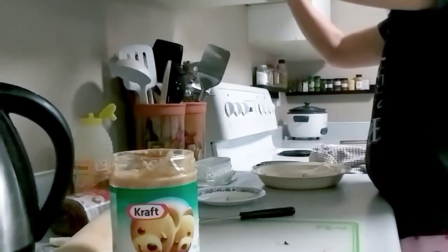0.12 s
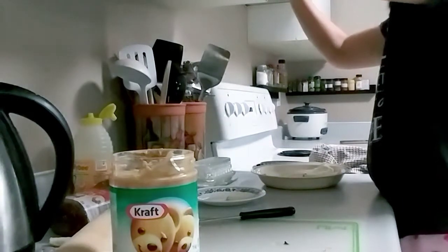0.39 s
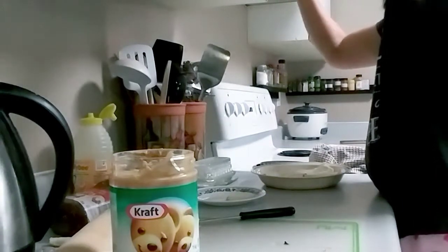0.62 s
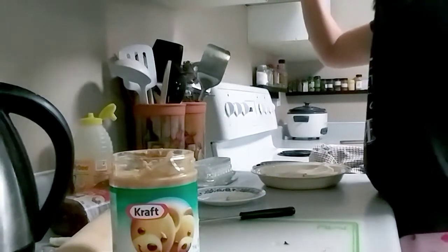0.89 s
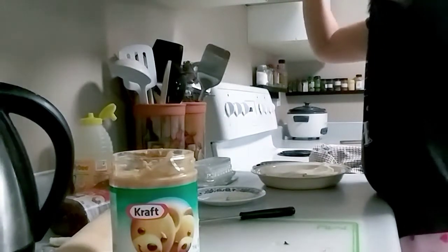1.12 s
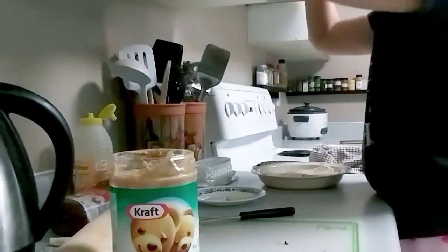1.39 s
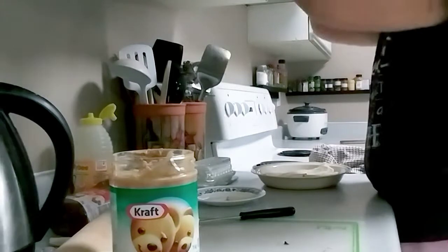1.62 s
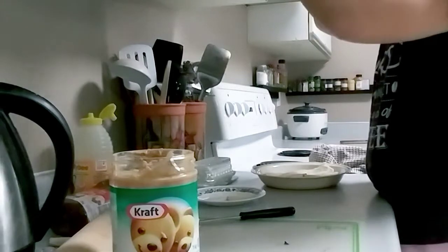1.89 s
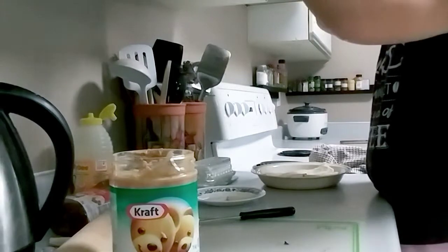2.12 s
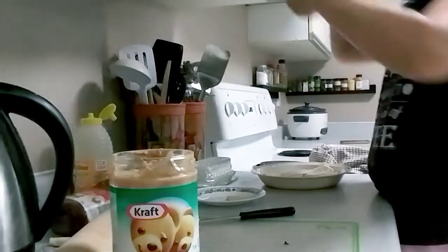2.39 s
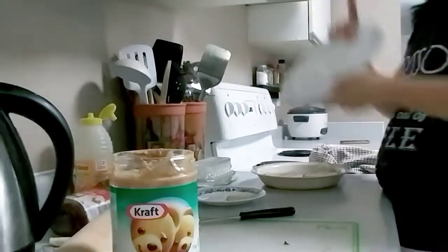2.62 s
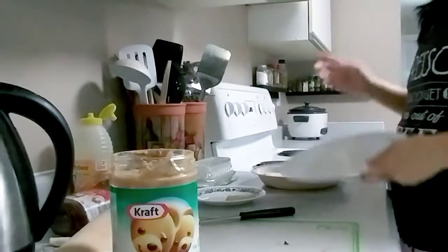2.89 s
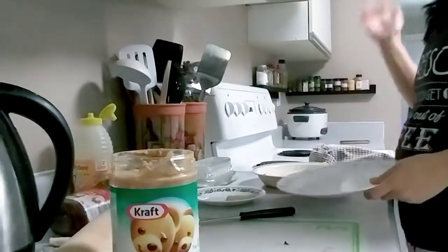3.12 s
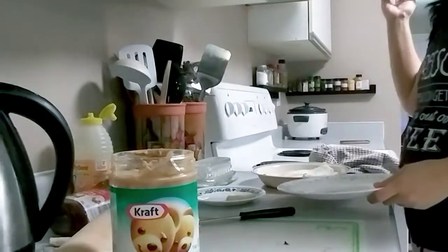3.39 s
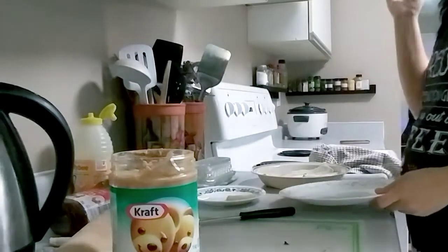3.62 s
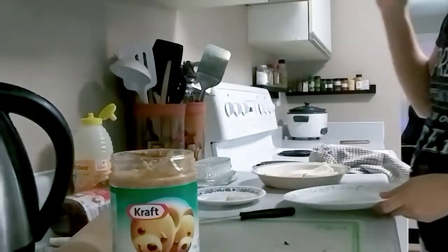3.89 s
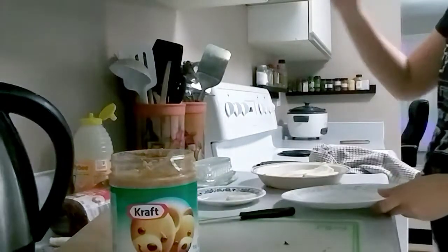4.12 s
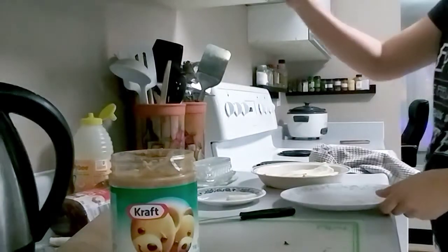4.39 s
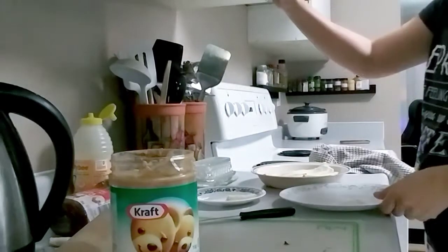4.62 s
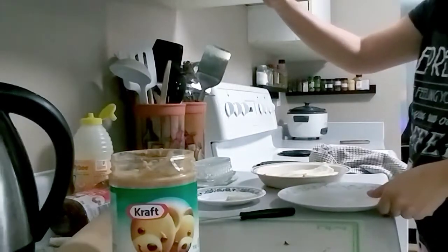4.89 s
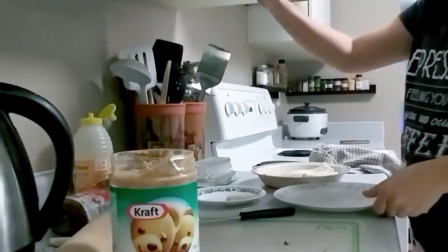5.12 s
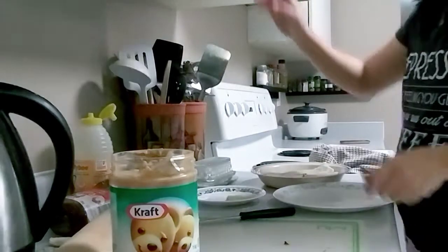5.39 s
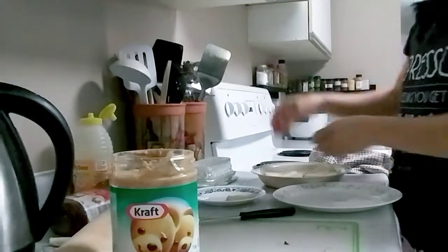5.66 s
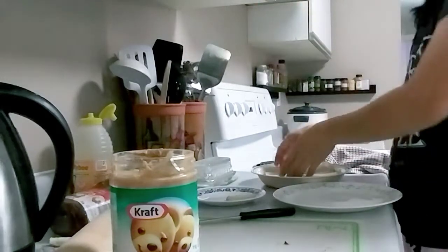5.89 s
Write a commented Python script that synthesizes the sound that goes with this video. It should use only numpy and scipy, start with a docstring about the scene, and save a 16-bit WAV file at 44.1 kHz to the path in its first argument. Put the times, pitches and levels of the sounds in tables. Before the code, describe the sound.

Ceramic plates knock, scrape and ring irregularly inside a cupboard, with a few hard blows that thump the wood. After a last clack the sound thins to room air, a low appliance hum and tiny touches. A cupboard door knocks and its hinge chirps briefly; later comes a light grip, a heavy low door thud and a bright short plate clink. Small reverberant kitchen, stereo leaning right, loud hits squeezed by automatic gain.

```python
"""Dishes rattle in a kitchen cupboard as a plate is drawn from the stack; doors knock, a hinge squeaks,
a door thuds shut and the plate clinks on the counter, over room air and an appliance hum.
Blows are short noisy contacts that set off broad resonances and thin ringing tones in a small hard room.
The squeak is a gliding stack of tones, the thuds are low sines, sliding and soft noises are shaped noise.
A stereo microphone with gain control picks it all up, louder on the right."""
import sys
import numpy as np
from scipy import signal
from scipy.fft import rfft, irfft, next_fast_len
from scipy.io import wavfile
from scipy.ndimage import uniform_filter1d, map_coordinates

SR = 44100
rng = np.random.default_rng(int(sys.argv[2]) if len(sys.argv) > 2 else 0)


def generate_wav(sig):
    """Save sig (samples, or channels by samples) to the path in sys.argv[1] as 16-bit PCM at SR."""
    pcm = np.round(np.clip(np.atleast_2d(sig).T, -1, 1) * 32767).astype(np.int16)
    wavfile.write(sys.argv[1], SR, pcm)


def voltage_ratio(decibels):
    """Convert decibels (scalar or array-like) to amplitude ratios, 20 dB per decade."""
    exponent = np.asarray(decibels, float) / 20
    return 10 ** exponent


N = 265246
LENGTH = 2 ** 15  # samples in the sound of one blow
LEFT_DB = -4.5  # left channel against the right

# broad resonances of struck dishes, from boom, thump and bowl to crack and sheen: (centre [Hz], width [Hz])
DISH_BODY = [(115, 64), (300, 240), (770, 460), (2600, 4600), (8500, 11000)]
# the same five for a wooden door: (centre [Hz], width [Hz])
DOOR_BODY = [(125, 58), (330, 310), (640, 660), (1700, 5700), (6000, 4000)]


def unit(x):
    """Scales a sound to rms 1."""
    return x / np.sqrt(np.mean(x ** 2) + 1e-20)


def along(points, hz):
    """Reads a curve of (Hz, value) points on a logarithmic frequency axis."""
    f, v = np.transpose(points)
    return np.interp(np.log(hz + 1), np.log(f + 1), v)


def curves(rows):
    """Joins timed rows by straight lines: one value per sample for each column after the time."""
    s, *cols = np.transpose(rows)
    return [np.interp(np.arange(N) / SR, s, c) for c in cols]


def wobble(rate):
    """A smooth random curve through rate random points a second."""
    knots = rng.standard_normal(int(N * rate / SR) + 4)
    return map_coordinates(knots, [np.arange(N) * rate / SR])


def filtered(x, response):
    """Multiplies the spectrum of x by a response of frequency."""
    m = next_fast_len(x.shape[-1] + 8192)
    spectrum = rfft(x, m) * response(np.fft.rfftfreq(m, 1 / SR))
    return irfft(spectrum, m)[..., :x.shape[-1]]


def resonance(f, hz, width_hz):
    """The response of a resonance that rings after it is struck, with gain 1 at its centre."""
    return 1j * f * width_hz / (hz * hz - f * f + 1j * f * width_hz)


def spread(pair, gain):
    """Mixes two unrelated noises into left and right: alike in the bass, nearly unrelated above."""
    # how alike left and right are: (frequency [Hz], likeness [0 to 1])
    alike = [(60, 1), (200, 0.7), (400, 0.75), (900, 0.024), (1500, 0.042)]

    def mid_side_gains(f):
        turn = np.arccos(np.clip(along(alike, f), -1, 1)) / 2
        return gain(f) * [np.cos(turn), np.sin(turn)]

    mid, side = filtered(pair, mid_side_gains)
    return np.array([mid + side, mid - side])


def rush(spectrum):
    """Steady stereo noise of rms 1 with the given tone colour."""
    return unit(spread(rng.standard_normal((2, N)), lambda f: voltage_ratio(along(spectrum, f))))


def room(direct):
    """A fresh stereo echo tail of energy 1 after the direct sound; near walls make its start denser."""
    # time in which each pitch dies away by 60 dB: (frequency [Hz], t60 [s])
    kitchen = [(60, 0.99), (250, 0.31), (1000, 0.46), (4000, 0.4), (9000, 0.31), (14000, 0.2)]
    f, t, z = signal.stft(rng.standard_normal((2, LENGTH // 2)), SR, nperseg=256)
    decay = voltage_ratio(-60 * t / along(kitchen, f)[:, None])
    tail = signal.istft(z * decay, SR, nperseg=256)[1]
    t = np.arange(tail.shape[1]) / SR
    onset = (1 - np.exp(-t / 0.0019)) * (1 + 2.0 * np.exp(-t / 0.0082))
    tail = spread(tail, np.ones_like) * onset
    tail /= np.sqrt(np.sum(tail ** 2) / 2)
    tail[:, 0] += direct
    return tail


def blows(rows, bands, modes, gain_db, ring_db, scatter_db, contact_s, direct, open_air, boom_db,
          detune, follow):
    """Each blow: a brief rough contact through broad body resonances and thin modes, into the room.

    scatter_db and detune vary the modes from blow to blow; follow is how far they take the body's colour.
    """
    out = np.zeros((2, N + LENGTH))
    f = np.fft.rfftfreq(LENGTH, 1 / SR)
    t = np.arange(2000) / SR
    for s, db, thump_db, bowl_db, sheen_db in rows:
        # one sharp touch, then a short chatter
        contact = voltage_ratio(-60 * t / contact_s) * rng.standard_normal(len(t))
        contact *= .75 / np.linalg.norm(contact)
        contact[0] = .4

        levels = (thump_db + boom_db, thump_db, bowl_db, 0, sheen_db)
        body = 0
        for k, ((hz, width), level) in enumerate(zip(bands, levels)):
            # applied twice, a resonance spills less to its sides; the root of the width keeps its energy
            body = body + (-1) ** k * voltage_ratio(level) * resonance(f, hz, width) ** 2 * np.sqrt(SR / width)

        # where the blow lands colours the modes like the body
        colour = [(hz, follow * level) for (hz, width), level in zip(bands[1:], levels[1:])]
        ring = 0
        for hz, level, t60 in modes:
            mode_db = ring_db + level + along(colour, hz) + scatter_db * rng.standard_normal()
            mode_hz = hz * (1 + detune * rng.standard_normal())
            width = np.log(1000) / np.pi / t60
            # the factor t60 makes the starting strength independent of the ringing time
            ring = ring + voltage_ratio(mode_db) * resonance(f, mode_hz, width) * t60

        answer = rfft(room(direct), LENGTH)
        # ringing also goes straight to the microphones, arriving a little later on the left
        straight = open_air * np.exp(-2j * np.pi * f * np.array([[.00008], [0]]))
        spectrum = body * (rfft(contact, LENGTH) * answer + ring * (answer + straight))
        sound = irfft(spectrum, LENGTH) * np.linspace(1, 0, LENGTH) ** .5
        # the sound takes a few milliseconds to build
        sound *= np.minimum(1, .45 + np.arange(LENGTH) / SR / .009)
        out[:, round(s * SR):][:, :LENGTH] += voltage_ratio(db + gain_db) * sound
    return out[:, :N]


def background():
    """Room air is noise that wavers a little; the appliance hum is noise through a narrow low resonance."""
    # tone colour of the room air: (frequency [Hz], relative level [dB])
    air_colour = [(25, -31), (60, -5.5), (120, -15), (200, -20), (600, -24), (1300, -30.5), (3000, -32.5),
                  (9000, -44.5)]
    # appliance hum: (centre [Hz], width of the resonance [Hz], level [dB])
    hum_settings = (118, 22, -62)
    air_db = -66.5 + 1.5 * wobble(5.3)
    hz, width_hz, hum_db = hum_settings
    hum = unit(filtered(rng.standard_normal(N), lambda f: resonance(f, hz, width_hz) ** 2))
    return voltage_ratio(air_db) * rush(air_colour) + voltage_ratio(hum_db) * hum


def soft_noises():
    """Sleeve rustles, a knock's dull thump, the closing door's puff: each swells, then fades more slowly."""
    # (time of the peak [s], length [s], level [dB], lowest frequency [Hz], highest frequency [Hz])
    puffs = [(2.639, 0.018, -66, 6940, 8450), (3.06, 0.021, -70, 1197, 4860),
             (3.299, 0.044, -73.5, 1494, 8400), (3.523, 0.02, -41, 69.4, 1300),
             (3.532, 0.017, -52.5, 1040, 6000), (3.949, .03, -39, 1660, 13800),
             (4.288, 0.044, -64.5, 293, 8320), (4.979, 0.0067, -39, 220, 1620),
             (4.988, 0.015, -39, 224, 1490)]
    t, out = np.arange(N) / SR, np.zeros((2, N))
    for s, length, db, low_hz, high_hz in puffs:
        rise = np.exp(-((t - s) / length) ** 2)
        fade = 1 / np.cosh(np.clip((t - s) / length / 1.7, 0, 20))
        swell = np.where(t < s, rise, fade)
        band = [(low_hz / 2, -24), (low_hz, 0), (high_hz, -9), (high_hz * 2, -36), (high_hz * 4, -90)]
        out += voltage_ratio(db + 2.2 * wobble(90)) * swell * rush(band)
    return out


def sliding():
    """Dishes and hands rub along: uneven, grainy noise in a dull and a bright part."""
    # loudness of the rubbing before its unevenness: (time [s], level [dB])
    slide = [(0, -49.5), (.1, -39.5), (.4, -56.5), (.47, -50), (.6, -40), (.85, -61.5), (1.1, -52),
             (1.3, -53), (1.47, -68), (1.54, -58), (1.78, -54.5), (1.87, -65.5), (1.95, -47.5), (2.3, -91)]
    # tone colour of the dull part: (frequency [Hz], relative level [dB])
    dull_colour = [(150, -32), (300, -7), (800, -2.5), (1600, -6), (3000, -38)]
    # tone colour of the bright part: (frequency [Hz], relative level [dB])
    bright_colour = [(1000, -24.5), (2200, 2), (4500, -2), (6500, -8), (7900, -6), (9500, -19),
                     (11000, -32), (16000, -31.5)]
    level = voltage_ratio(curves(slide)[0]) * (np.arange(N) / SR < slide[-1][0])
    dull = voltage_ratio(0.7 + 3.0 * wobble(18) + 0.77 * wobble(130)) * rush(dull_colour)
    bright = voltage_ratio(5.9 * wobble(40) + 2.9 * wobble(130)) * rush(bright_colour)
    return level * (dull + bright)


def hinge():
    """The hinge sticks and slips at a jittery rate: a gliding stack of tones, mostly heard via the room."""
    # (time [s], slips per second [Hz], level [dB])
    slips = [(3.884, 1725, -47), (3.909, 1680, -35), (3.918, 1500, -31), (3.927, 1340, -30),
             (3.942, 1335, -34), (3.952, 1500, -42), (3.961, 1830, -32), (3.976, 2150, -31),
             (3.986, 2120, -40), (3.999, 1980, -51)]
    # how strongly the door sends out each pitch: (frequency [Hz], level [dB])
    door_colour = [(1300, -15.5), (2000, -4.5), (2800, -3.5), (3500, 0.5), (3900, -14), (4300, -9),
                   (5000, -10), (7000, -10.5), (8200, -8), (10000, -15)]
    # a thin whistle as the hinge first gives: (start [s], rise [s], start pitch [Hz],
    # settled pitch [Hz], sag [Hz per s], peak level [dB], fade [dB per s])
    whistle = (3.815, .02, 5700, 5420, 3200, -41, 110)
    t = np.arange(N) / SR
    start, stop = slips[0][0], slips[-1][0]
    hz, db = curves(slips)

    # the squeal breaks up as the door speeds: roughness doubles every 22 ms
    rough = .07 * 2 ** (np.clip(t - start, 0, stop - start) / .022)
    phase = 2 * np.pi * np.cumsum(hz * (1 + .05 * rough * wobble(400))) / SR
    gate = np.clip((t - start) / 0.013, 0, 1) * np.clip((stop - t) / 0.0046, 0, 1)
    squeak = np.zeros(N)
    for k in range(1, 7):
        partial_db = db + along(door_colour, k * hz)
        flicker_db = 4.1 * np.minimum(rough, 1) * wobble(200)
        squeak += gate * voltage_ratio(partial_db + flicker_db) * np.sin(k * phase)

    s, rise, start_hz, settled_hz, sag_hz, peak_db, fade_db = whistle
    u = np.clip(t - s, 0, None)
    pitch = settled_hz - sag_hz * u + (start_hz - settled_hz) * np.exp(-2 * u / rise)
    pitch = pitch * (1 + .005 * wobble(400))
    whistle_db = peak_db - fade_db * np.clip(u - rise, 0, None) + 2 * wobble(200)
    swell = np.minimum(u / rise, 1) ** 2 * voltage_ratio(whistle_db) * (t < slips[1][0])
    squeak += swell * np.sin(2 * np.pi * np.cumsum(pitch) / SR)
    return signal.fftconvolve(squeak[None], room(direct=0.79), axes=1)[:, :N]


def low_thuds():
    """Low tones swell with each thump of the cupboard and are choked shortly after."""
    # two hard dish blows that thump the cupboard, then the closing door:
    # (start [s], rise [s], stop [s], pitch [Hz], level [dB], t60 before the stop [s])
    thumps = [(.555, .015, .7, 111, -23.5, .3), (1.183, 0.0097, 1.26, 122.6, -30.5, 0.35),
              (4.966, .035, 5.003, 123.1, -6.5, .6), (4.997, 0.0035, 5.062, 63.65, -16.5, 0.58),
              (5.1, 0.0085, 5.3, 60.95, -25.5, 0.22)]
    t, out = np.arange(N) / SR, np.zeros(N)
    for s, rise, stop, hz, db, t60 in thumps:
        u = np.clip(t - s, 0, None)
        swell = 1 - np.exp(-(u / rise) ** 2)
        choke_db = -60 * np.clip(t - stop, 0, None) / 0.017
        out += voltage_ratio(db - 60 * u / t60 + choke_db) * swell * np.sin(2 * np.pi * hz * u)
    return out


def door_grips():
    """A hand takes hold of the second door: its panel and handle ring briefly."""
    # (time [s], level before gain_db [dB], then relative thump [dB], bowl [dB], sheen [dB])
    grips = [(4.609, -35, 8.8, 8, -10), (4.629, -44.5, 22, 7.9, -25)]
    # ringing of the door and its handle: (frequency [Hz], relative level [dB], t60 [s])
    handle_modes = [(336, -11.5, .2), (458, -15.5, 0.23), (684, -11, 0.38), (899, -6, 0.089),
                    (2220, -1, 0.12), (2760, 7, .05), (3350, 17, 0.035), (4075, 11.5, .07)]
    return blows(grips, DOOR_BODY, handle_modes, gain_db=16.0, ring_db=23, scatter_db=1.5,
                 contact_s=0.039, direct=1.0, open_air=1.4, boom_db=-8.5, detune=0, follow=0)


def door_knocks():
    """Doors and hands knock on wood, whose ringing dies away quickly at most high pitches."""
    # (time [s], level before gain_db [dB], then relative thump [dB], bowl [dB], sheen [dB])
    knocks = [(3.239, -65, 8, -12, -26), (3.501, -51.5, 3.5, 14.5, -28), (3.785, -21.5, -1, 8, -14),
              (5.818, -62.5, 7.5, 10, 0)]
    # ringing of the doors before random detuning: (frequency [Hz], relative level [dB], t60 [s])
    wood_modes = [(141, -3.5, 0.1), (310, -15.5, 0.22), (735, -8.5, 0.41), (1123, -10.5, 0.11),
                  (1332, 1, 0.059), (2226, 7.5, 0.048), (3420, 14, 0.029), (4330, 1, .09)]
    return blows(knocks, DOOR_BODY, wood_modes, gain_db=17.5, ring_db=24.5, scatter_db=2.5,
                 contact_s=0.043, direct=0.76, open_air=0.97, boom_db=-7.0, detune=.01, follow=0)


def plate_grazes():
    """The lifted plate grazes its neighbours and rings faintly."""
    # (time [s], level before gain_db [dB], then relative thump [dB], bowl [dB], sheen [dB])
    grazes = [(2.3971, -58.5, -7, -4, 5.4), (2.5094, -66, -5, -5, 1), (2.655, -56, -9, -16, 2)]
    # ringing of the lifted plate: (frequency [Hz], relative level [dB], t60 [s])
    lifted_plate_modes = [(759, -8, .19), (1380, -14, .2), (2299, -10, .18), (3435, -14, .2), (4441, 2, .07),
                          (5000, -8, .07), (5900, 0, .05), (7820, -3, .06), (8070, -2, .05)]
    return blows(grazes, DISH_BODY, lifted_plate_modes, gain_db=16.5, ring_db=35.5, scatter_db=1.5,
                 contact_s=0.032, direct=.3, open_air=2.5, boom_db=-2.0, detune=0, follow=0.62)


def plate_clinks():
    """The plate meets the counter and settles in quick touches, ringing in the open."""
    # (time [s], level before gain_db [dB], then relative thump [dB], bowl [dB], sheen [dB])
    clinks = [(5.059, -16, -15.5, -6, -2.5), (5.066, -6, -7.5, -8.5, -3), (5.075, -13, -13.5, -13.5, -3.5)]
    # ringing of the plate: (frequency [Hz], relative level [dB], t60 [s])
    plate_modes = [(705, -14, .12), (1346, -12, .2), (1997, -2, .15), (2019, -16.5, .58), (2040, -8, .24),
                   (2186, -18, .25), (2988, -12, .15), (3122, -6, .22), (3165, 2, .11), (3500, -3, .06),
                   (4064, -5, .17), (4484, 0, .13), (5000, -6, .07), (7542, -14, .2), (8258, -4, .12),
                   (8430, -12, .22)]
    return blows(clinks, DISH_BODY, plate_modes, gain_db=9.0, ring_db=32.5, scatter_db=1.5,
                 contact_s=0.008, direct=.3, open_air=2.4, boom_db=3.5, detune=0, follow=0)


def rebounds(rows):
    """A dish struck hard rocks and lands again 17 ms later, weaker, with more wood and less sheen."""
    second = [(s + .017, db - 6, thump + 6.5, bowl, sheen - 3.5)
              for s, db, thump, bowl, sheen in rows if db > -15]
    return rows + second


def dish_clatter():
    """Dishes in the stack knock together; each blow rings them a little differently."""
    # (time [s], level before gain_db [dB], then relative wooden thump [dB], bowl [dB], sheen [dB])
    clatter = [(0.0296, -33, 3, -10, -22), (0.1487, -1, -17, -5, -3.5), (0.4227, -34, -6, -6.5, -5),
               (0.4489, -26, -6.5, -9.5, -3), (0.4997, -16, -11.5, -9, -16), (0.5481, 1.5, -12.5, -14, -8),
               (0.8795, -28, -2, -3.5, -27), (0.915, -48.5, 12, -1.5, -20.5),
               (0.9904, -28, -14, -10.5, -0.5), (1.073, -24.5, -16, -18, -5),
               (1.115, -44, 9.5, -23.5, -2.5), (1.1784, -15, -12, -8.5, -3), (1.377, -53.5, 0, 2, 0),
               (1.507, -38.5, -21, -47, -2), (1.5729, -37.5, -14.5, -11.5, -1),
               (1.6479, -35, -13.5, -13, -1), (1.7054, -25, -17, -18, -9), (1.7637, -29.5, -14.5, -43, -13),
               (1.8849, -33, -28.5, -48, -0.5), (1.9298, -23.5, -16, -17.5, 1),
               (1.9863, -8.5, -15.5, -15.5, 1)]
    # ringing of the dishes before random detuning: (frequency [Hz], relative level [dB], t60 [s])
    stack_modes = [(300, -11, .09), (741, -6, .22), (823.7, -1, .24), (1220, -12, .18), (1380, -12, .16),
                   (1770, -8, .1), (1900, -7, .17), (2300, -15, .16), (2410, -14.5, .15), (2960, -12, .2),
                   (3480, -10, .18), (3736, -12.5, .075), (4390, -14, .17), (5270, -16, .12),
                   (7600, -8, .1), (7900, -3, .12)]
    return blows(rebounds(clatter), DISH_BODY, stack_modes, gain_db=19.0, ring_db=26.0, scatter_db=3,
                 contact_s=0.026, direct=0.64, open_air=0.95, boom_db=-6, detune=.01, follow=0.67)


def scene():
    """Adds all sources, louder on the right."""
    mix = background() + soft_noises() + sliding() + hinge() + low_thuds()
    mix = mix + door_grips() + door_knocks() + plate_grazes() + plate_clinks() + dish_clatter()
    return mix * voltage_ratio([[LEFT_DB / 2], [-LEFT_DB / 2]])


def top_cut(x):
    """Nothing passes above the cut-off."""
    return signal.sosfilt(signal.butter(12, 16290, fs=SR, output="sos"), x)


def record(dry):
    """Overall tone colour and amplifier hiss, gain control that holds back loud moments, a hard ceiling."""
    # overall tone colour, with a gap from 10 to 12 kHz: (frequency [Hz], level [dB])
    tone_colour = [(30, -25), (55, 5), (7000, -2.5), (7900, 5.5), (8900, -3), (10000, -21), (11600, -24.5),
                   (12400, -10.5), (16000, -12)]
    x = filtered(dry, lambda f: voltage_ratio(along(tone_colour, f)))
    balance = voltage_ratio([[LEFT_DB / 2], [-LEFT_DB / 2]])
    x = x + voltage_ratio(-78.5) * balance * rng.standard_normal(x.shape)
    # loudness over 10 ms; the gain falls gradually around -12 dB and above
    level = np.sqrt(np.abs(uniform_filter1d(np.mean(x ** 2, 0), size=441)))
    x = x / (1 + (level / voltage_ratio(-12.0)) ** 2) ** 0.32
    finished = np.clip(x, -.93, .93)
    return top_cut(finished)


dry = scene()
out = record(dry)
generate_wav(out)
```